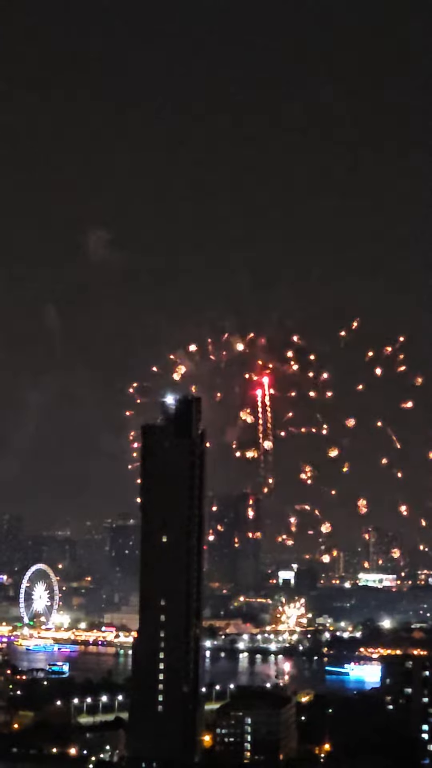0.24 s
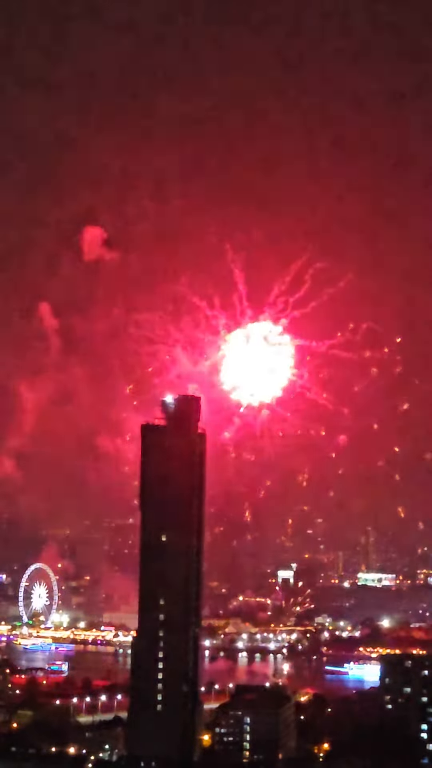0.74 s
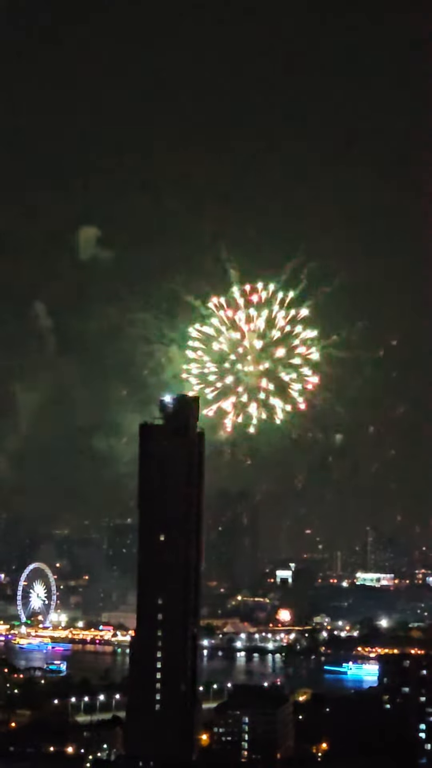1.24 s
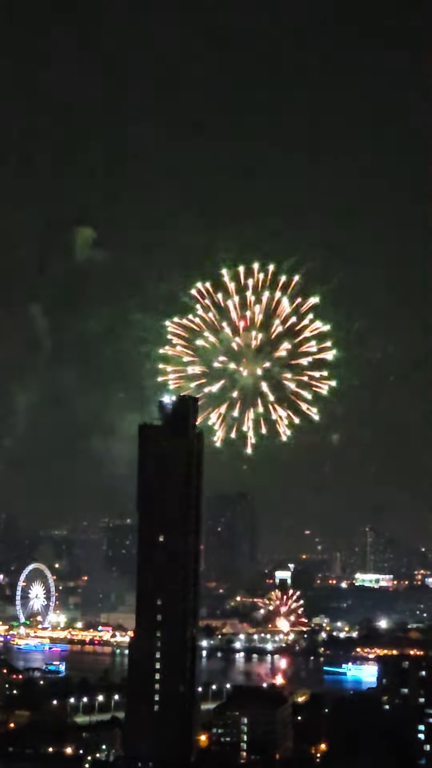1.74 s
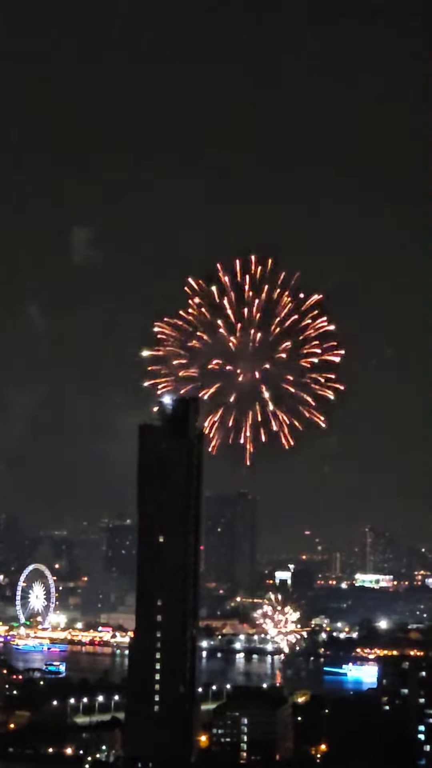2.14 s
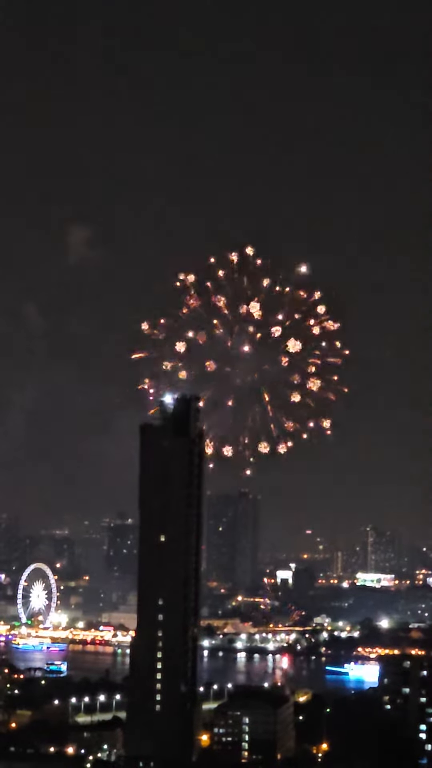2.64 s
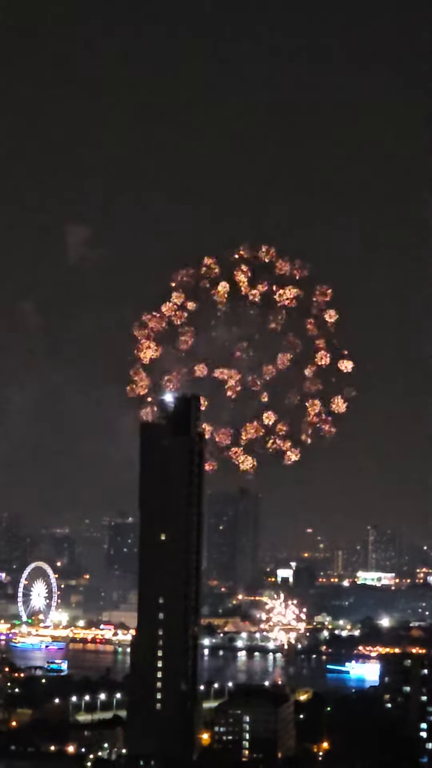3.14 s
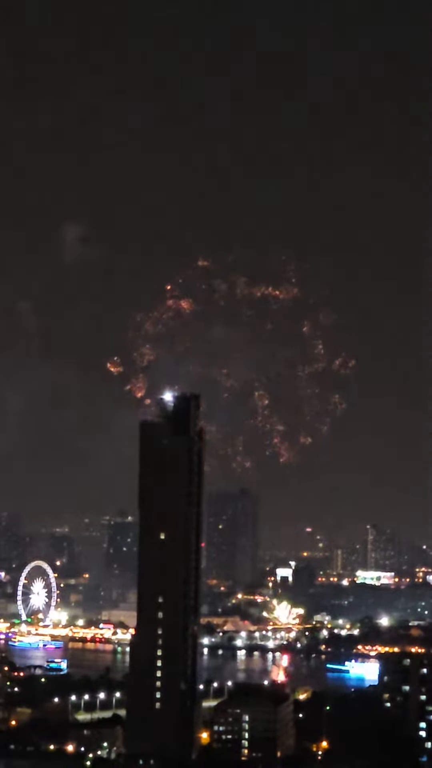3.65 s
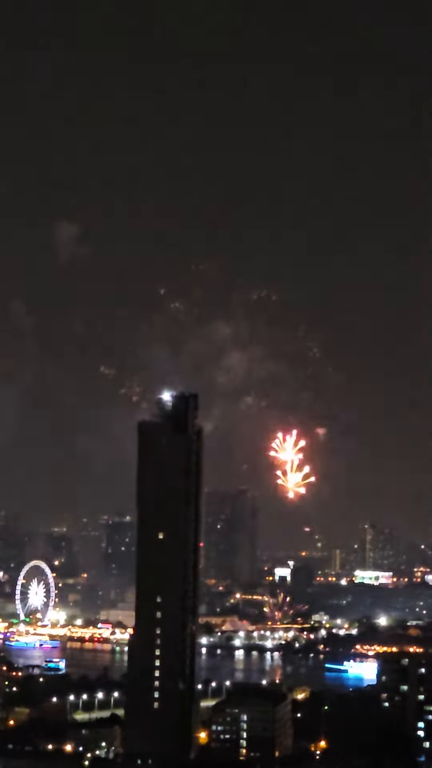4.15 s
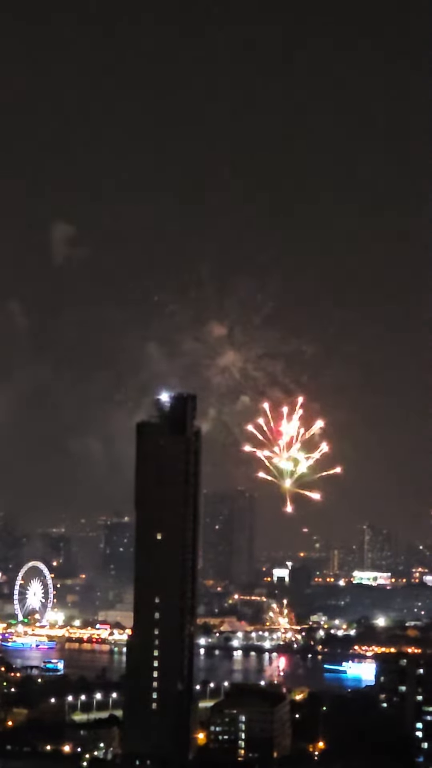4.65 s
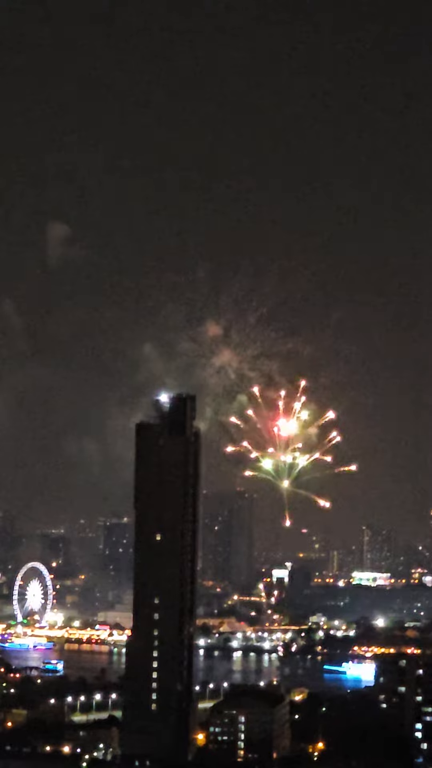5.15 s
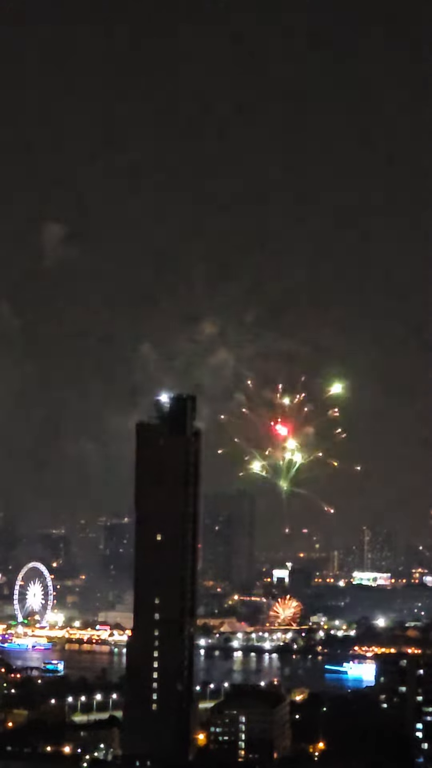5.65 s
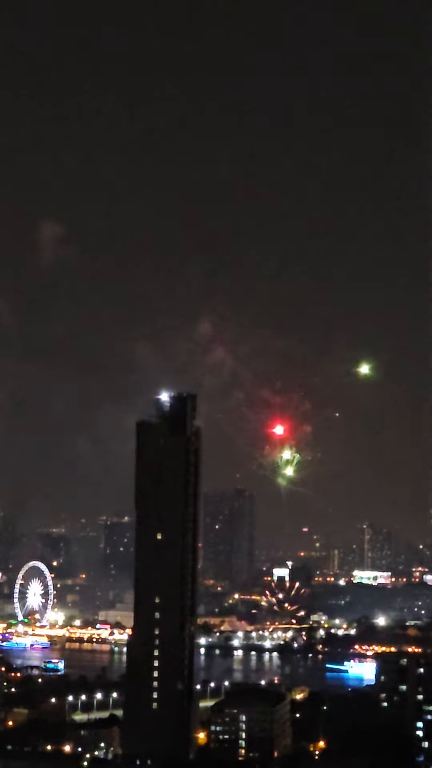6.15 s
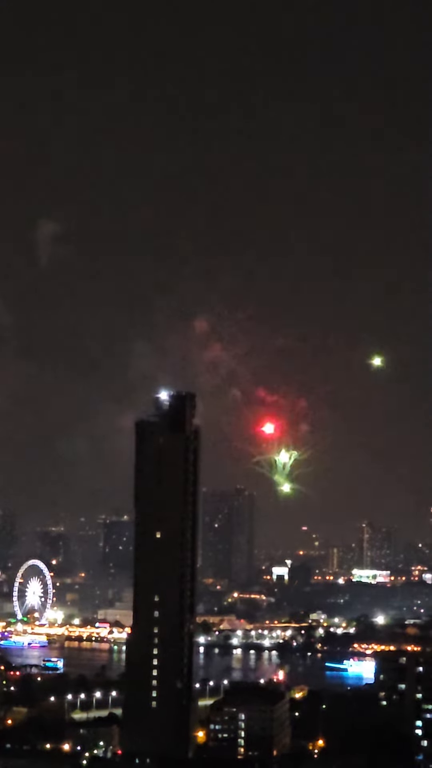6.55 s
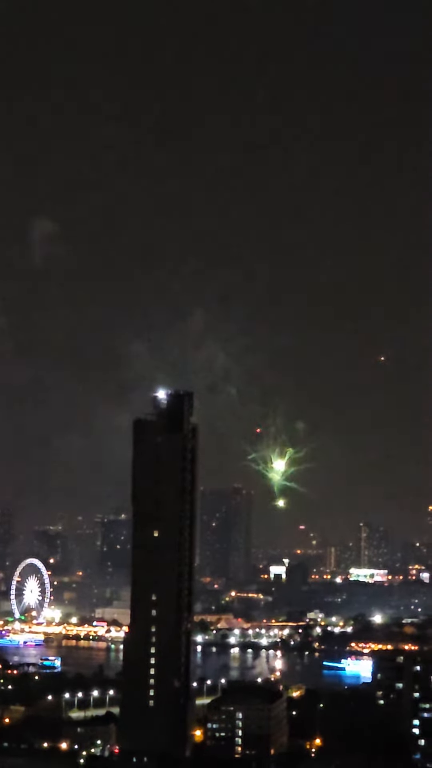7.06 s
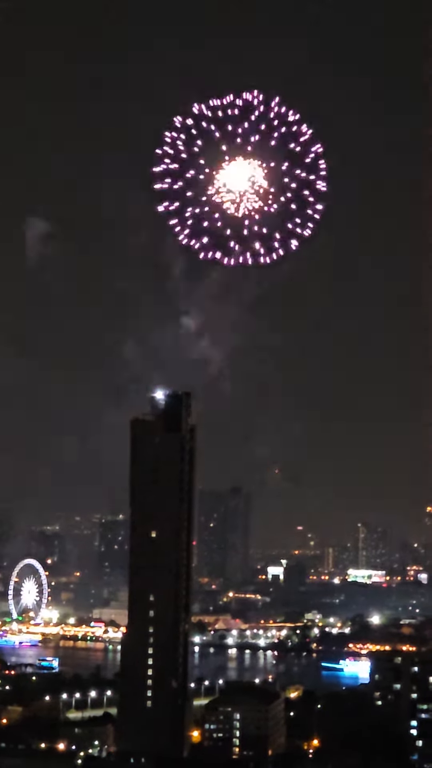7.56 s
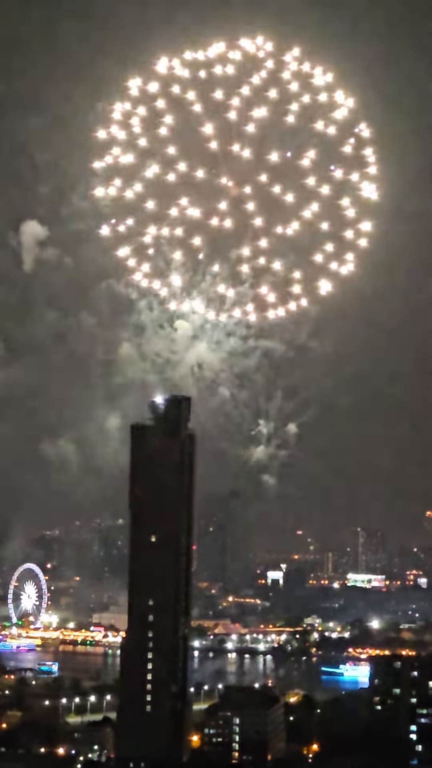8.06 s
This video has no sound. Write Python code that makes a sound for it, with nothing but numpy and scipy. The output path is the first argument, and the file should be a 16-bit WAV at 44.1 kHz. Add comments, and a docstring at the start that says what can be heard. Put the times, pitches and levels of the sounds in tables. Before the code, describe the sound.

A stereo phone on a high balcony hears distant fireworks over a night city. Soft, low traffic hiss runs throughout beneath rolling echoes. Dull booms cluster from 0.2 to 0.7 seconds, with faint close rustling and tiny high squeaks around 0.4 to 0.7. A strong thump lands at 1.2, more at 1.6 and 1.9 to 2.3, with small squeaks near 2.0 and 2.5. Heavy blasts follow at 2.65, 3.0 and 3.25, then their rumble decays into a lull until 4.7, with very faint squeaks near 4.5. A dense volley pounds from 4.7 to 6.4, strongest around 5.4, 5.9 and 6.4, while light rustle swells near 4.8. A weak thud and one dry close tick come around 6.9. After a quieter rumble, separate booms hit at 7.4, 7.85 and 8.07, echoes still rolling at the end. Deep bass is thinned and peaks are limited.

```python
"""A high balcony over a night city, with fireworks bursting far off.
Each shell sends a pressure wave dulled by the air; random echoes off the buildings merge into a rolling rumble.
Shaped noise makes the steady city hiss. Close by there are a flickering treble rustle, tiny wavering squeaks
and one tick of narrow noise. The phone cuts the deep bass of blasts and echoes and limits the peaks of the mix."""
import sys
import numpy as np
from scipy import signal
from scipy.fft import rfft, irfft, next_fast_len
from scipy.io import wavfile
from scipy.ndimage import uniform_filter1d, minimum_filter1d

SR = 44100
rng = np.random.default_rng(int(sys.argv[2]) if len(sys.argv) > 2 else 0)


def digitize_waveform(pressure):
    """Quantize a signal to 16-bit integers and store it at the path in sys.argv[1].

    Rows of a 2-D input are taken as channels; values are limited to [-1, 1].
    """
    field = np.atleast_2d(pressure).T
    bounded = np.clip(field, -1, 1)
    quanta = np.round(bounded * 32767).astype(np.int16)
    wavfile.write(sys.argv[1], SR, quanta)


def rack_gain(trim_db):
    """Turn a fader trim in dB into the linear factor to multiply a signal by."""
    fader = np.asarray(trim_db, float)
    return 10 ** (fader / 20)


N = 366030  # samples, 8.3 s


def low(x, hz, order):
    """Low-pass."""
    return signal.sosfilt(signal.butter(order, hz, fs=SR, output="sos"), x)


def band(x, lo_hz, hi_hz):
    """Band-pass."""
    return signal.sosfilt(signal.butter(2, [lo_hz, hi_hz], "band", fs=SR, output="sos"), x)


def level(x, db):
    """Scale to an rms level."""
    return x * rack_gain(db) / np.sqrt(np.mean(x ** 2))


def curve(s, values):
    """Straight lines between points in time."""
    return np.interp(np.arange(N) / SR, s, values)


def colour(x, hz, db, radians=None):
    """Gain and phase joined by straight lines over log frequency."""
    size = next_fast_len(N + SR)  # padded, so that the end does not wrap round to the start
    log_f = np.log(np.arange(size // 2 + 1) * SR / size + 1)
    gain = rack_gain(np.interp(log_f, np.log(hz), db))
    turn = 1 if radians is None else np.exp(1j * np.interp(log_f, np.log(hz), radians))
    return irfft(rfft(x, size) * turn * gain, size)[:N]


def walk(rate):
    """Random levels held 1 / rate s, with the steps smoothed twice."""
    k = int(SR / rate)
    held = np.repeat(rng.standard_normal(N // k + 1), k)
    return uniform_filter1d(uniform_filter1d(held, k), k)[:N]


def swell_shape(s, rise_s, fade_s):
    """Power, on every 32nd sample, that builds up to one at time s and dies away."""
    age = np.arange(0, N, 32) / SR - s
    return np.exp(2 * np.where(age < 0, age / rise_s, -age / fade_s))


def envelope(power):
    """Gain for every sample from a coarse run of power."""
    return curve(np.arange(0, N, 32) / SR, np.sqrt(power))


def bass_cut(x):
    """The phone's steep bass cut turns every push into a short falling boom."""
    # resonant high-passes in series: corner_hz, damping (no unit)
    low_cut = [(86.5, 0.65), (66, 2.8)]
    for hz, damping in low_cut:
        w = 2 * np.pi * hz
        x = signal.lfilter(*signal.bilinear([1, 0, 0], [1, w * damping, w * w], SR), x)
    return x


def blast(push_ms):
    """A jump of pressure, a fall through zero after push_ms and a suction."""
    u = np.arange(SR // 20) / SR / (push_ms / 1000)
    return (1 - u) * np.exp(-u)


def city():
    """Far traffic: smooth noise, swelling a little; the treble is wider than the bass."""
    # spectrum of the hiss: frequency_hz, common_db per Hz, wide_db per Hz (opposite at the two ports)
    city_hiss = [(22, -62.5, -80), (42.8, -51.5, -75.5), (209, -53, -71), (340, -72.5, -88.5),
                 (750, -66, -78), (1190, -70.5, -83), (1357, -68, -75.5), (1734, -78, -85),
                 (1930, -73.5, -81), (2570, -86, -90.5), (3070, -87, -93), (4500, -101, -104),
                 (5600, -107, -110), (7600, -116, -116), (9400, -128, -128), (15000, -132, -131)]
    # the traffic swells and ebbs: time_s, gain_db
    traffic_swell = [(0, -2), (1, 0), (3.9, 0.5), (4.5, 2), (5.1, 1), (5.9, -1.6), (6.8, 0), (7.2, 0),
                     (8.3, 1.5)]
    hz, common_db, wide_db = np.transpose(city_hiss)
    white = rng.standard_normal((2, N)) * np.sqrt(SR / 2)  # unit power per Hz
    common, wide = colour(white[0], hz, common_db), colour(white[1], hz, wide_db)
    swell = rack_gain(curve(*np.transpose(traffic_swell)))
    return swell * np.array([common + wide, common - wide])


def rustle():
    """Close treble noise in two bands, swelling and flickering, partly different at each port."""
    # swells of the rustle: height_s, lower_band_db, upper_band_db, build_up_s, fade_s
    rustle_swells = [(0.08, -55.5, -63, 0.13, 0.24), (0.28, -53.5, -70, 0.2, 0.27),
                     (1.98, -60.5, -77.5, 0.2, 0.6), (2.6, -61.5, -91, 0.3, 0.33),
                     (3.95, -62, -75, 0.9, 0.79), (4.75, -53.5, -74, 0.27, 0.2),
                     (4.93, -53, -74.5, 0.2, 0.08), (5.92, -58, -81.5, 0.36, 0.98),
                     (6.901, -57, -78.5, 1, 0.5), (7.92, -64, -90, 0.12, 0.11),
                     (8.28, -66, -87.5, 0.28, 0.5)]
    # the two bands: low_edge_hz, high_edge_hz
    rustle_bands = [(2200, 5140), (6800, 9000)]
    # level between the swells: lower_band_db, upper_band_db
    rest_db = (-72, -92)
    out = 0
    for k, (lo_hz, hi_hz) in enumerate(rustle_bands):
        power = rack_gain(rest_db[k]) ** 2
        for s, *band_db, rise_s, fade_s in rustle_swells:
            power = power + rack_gain(band_db[k]) ** 2 * swell_shape(s, rise_s, fade_s)
        noise = rng.standard_normal((2, N)) + 0.61 * rng.standard_normal(N)
        noise = band(band(noise, lo_hz, hi_hz), lo_hz, hi_hz)
        flicker = rack_gain(1.2 * walk(90))
        out = out + level(noise, 0) * envelope(power) * flicker
    return out


def squeaks():
    """Short tones of wavering pitch with their octave, swelling and fading smoothly."""
    # tiny squeaks: start_s, fundamental_peak_db, pitch_hz, length_ms, octave_db (against the fundamental)
    squeak_list = [(.405, -51, 4150, 22, -23), (.52, -55, 4150, 50, -19), (.626, -48.5, 3770, 34, -18),
                   (.668, -53, 3900, 50, -23), (1.964, -45.5, 2840, 42, -6), (2.02, -51, 2900, 49, -16),
                   (2.472, -46.5, 3450, 20, -17), (4.445, -62, 5200, 18, -35), (4.565, -59, 5150, 25, -21)]
    out, waver = np.zeros(N), 1 + .013 * walk(160)
    for s, db, hz, ms, octave_db in squeak_list:
        n, i = int(ms * SR / 1000), int(s * SR)
        phase = 2 * np.pi * hz * np.cumsum(waver[i:i + n]) / SR
        tone = np.sin(phase) + rack_gain(octave_db) * np.sin(2 * phase)
        out[i:i + n] += rack_gain(db) * np.hanning(n) * tone
    return out


def tick():
    """A dry tick close by: narrow noise that rises and dies within milliseconds."""
    # start_s, noise_db (rms before the snap shapes it), low_edge_hz, high_edge_hz
    tick_settings = (6.893, -39, 3400, 4700)
    s, db, lo_hz, hi_hz = tick_settings
    age = np.maximum(np.arange(N) / SR - s, 0)
    snap = age / 0.0022 * np.exp(-age / 0.0021)
    return level(band(rng.standard_normal(N), lo_hz, hi_hz), db) * snap


def echoes(per_s, spread_db, push_ms):
    """Blasts that return at random moments with random strength and sign."""
    draw = rng.random((3, N))
    arrives = draw[0] < per_s / SR
    strength = rack_gain(-spread_db * np.log(draw[1] + 1e-9)) * np.sign(draw[2] - .5)
    return bass_cut(signal.fftconvolve(arrives * strength, blast(push_ms))[:N])


def roll():
    """The long way round leaves a boom; the shorter returns still rattle. A small share comes from the sides."""
    # flocks of echoes rolling in from the buildings:
    # height_s, boom_db, depth_db (deep part against the drummy part), rattle_db, fade_ms
    flocks = [(0.14, -23, 6.5, -45, 130), (0.22, -26, -10, -33.5, 50), (0.301, -12.5, -9, -18.5, 21),
              (0.364, -9.5, 3, -31, 60), (0.57, -14.5, -3, -36.5, 60), (0.631, -9, 7, -43, 40),
              (0.7, -12.5, 2, -28.5, 56), (1.001, -21.5, -5.5, -43.5, 170), (1.243, -18.5, -1, -30.5, 82),
              (1.401, -25, -1.5, -36.5, 150), (1.58, -13, -3.5, -23, 30), (1.619, -15, -0.5, -31, 44),
              (1.72, -19.5, -3.5, -28.5, 160), (1.918, -18.5, -3.5, -29, 44),
              (2.061, -17, -6.5, -30.5, 180), (2.36, -15, 5.5, -32, 63), (2.539, -23, -6.5, -40.5, 80),
              (2.679, -14.5, 2, -23.5, 51), (2.841, -19, 4, -33.5, 330), (3.014, -13.5, 0.5, -15, 17),
              (3.08, -16, -1, -30, 150), (3.249, -14, -3, -33.5, 74), (3.342, -17.5, -4, -26.5, 130),
              (3.55, -23, -10.5, -38, 170), (3.78, -18.5, 0, -34.5, 120), (4.08, -27.5, -2.5, -39, 50),
              (4.302, -22.5, -11.5, -53, 50), (4.44, -23.5, 11.5, -41.5, 47), (4.671, -13.5, -2, -21, 30),
              (4.74, -20, 3.5, -31, 37), (4.82, -26.5, 3, -38, 110), (4.99, -17, 0, -20.5, 30),
              (5.029, -13.5, -2, -22.5, 70), (5.1, -16.5, -8, -32, 44), (5.189, -15, -10.5, -24.5, 64),
              (5.29, -22, -4.5, -34, 110), (5.42, -12, 2, -27, 27), (5.439, -10.5, -4.5, -31.5, 22),
              (5.465, -13, 3, -28.5, 30), (5.601, -17, -0.5, -27, 100), (5.76, -17, -13.5, -32, 60),
              (5.83, -20.5, 5.5, -34.5, 69), (5.932, -15, -1, -28.5, 32), (6.039, -19, -5.5, -34, 120),
              (6.14, -10.5, -12.5, -25.5, 36), (6.235, -15.5, -8.5, -44, 36), (6.31, -18, -6.5, -40, 30),
              (6.418, -14, 1.5, -24, 100), (6.68, -22, -2, -32.5, 130), (6.79, -21.5, 7.5, -34.5, 80),
              (6.94, -20.5, -4, -30.5, 210), (7.24, -26, -6, -38, 77), (7.4, -25.5, 3.5, -40.5, 56),
              (7.46, -17.5, 2, -30, 47), (7.741, -18.5, 0, -32, 65), (7.92, -20, -2, -31, 120),
              (8.111, -16.5, -7.5, -29, 53), (8.279, -29, -1, -40.5, 100)]
    # the faintest echoes never stop: deep_db, drummy_db, rattle_db
    murmur_db = (-33.5, -29.5, -40)
    rise_share, rattle_share = 0.75, 0.59  # build-up against its own fade; rattle's fade against the boom's
    power = rack_gain(np.array(murmur_db))[:, None] ** 2
    for s, boom_db, depth_db, rattle_db, fade_ms in flocks:
        fade_s = max(fade_ms, 5) / 1000
        rattle_fade_s = rattle_share * fade_s
        deep_share = 1 / (1 + rack_gain(-depth_db) ** 2)
        boom = rack_gain(boom_db) ** 2 * swell_shape(s, rise_share * fade_s, fade_s)
        rattle = rack_gain(rattle_db) ** 2 * swell_shape(s, rise_share * rattle_fade_s, rattle_fade_s)
        power = power + np.array([deep_share * boom, (1 - deep_share) * boom, rattle])
    deep_gain, drummy_gain, rattle_gain = map(envelope, power)
    out = 0
    middle, sides = 1, np.array([[1], [-1]])  # sides: opposite sign at the two ports
    for sign, boom_share_db, rattle_share_db in ((middle, 0, 0), (sides, -23, -15)):
        deep = level(low(echoes(250, 2.0, 6), 125, order=4), boom_share_db)
        drummy = level(low(band(echoes(350, 1.52, 0.8), 125, 307), 252.6, order=6), boom_share_db)
        rattle = level(band(echoes(1200, 2.06, 0.86), 300, 627), rattle_share_db)
        out = out + sign * (deep * deep_gain + drummy * drummy_gain + rattle * rattle_gain)
    return out


def bursts():
    """Each blast arrives dull, with what is left of its sharp front; turbulent air frays the front into a spray."""
    # shell bursts and their strongest returns, levels before the filters and shaping below:
    # start_s, overpressure_db, push_ms, front_db (sharp front against the push), spray_db
    burst_list = [(0.2013, 6.5, 0.87, -26, -50), (0.3084, 6, 4.5, -19, -40), (0.339, -5, 4.4, -22, -47.0),
                  (0.372, -3, 0.86, -24, -44), (0.5656, 3, 1.1, -26, -48.5), (0.6306, -2, 8.7, -15.5, -45),
                  (0.6817, 2, 1.4, -6.5, -35.5), (0.702, -2.5, 2.5, -22, -47.0),
                  (1.143, -4.5, 0.8, -4, -42), (1.228, 16.5, 0.84, -22, -27.5), (1.5647, 7, 2.8, -10, -27),
                  (1.5922, -6, 8.0, -14, -32), (1.6135, 1.5, 3.4, -7, -41), (1.9213, 1, 0.97, -15.5, -40),
                  (2.0607, 3, 1.2, -16.5, -47.5), (2.291, 7, 0.8, -21.5, -47.5),
                  (2.322, 13, 8.0, -20.5, -28.5), (2.651, 8, 2.5, -12, -23), (2.698, 1, 3.0, -9, -45.5),
                  (2.8802, -5, 9.5, -13, -42), (3.0044, 8, 5.8, -2.5, -21.5), (3.058, 3.2, 13, -15, -42.5),
                  (3.1102, -5, 6.2, -16.5, -57), (3.2532, 17.5, 1.1, -18.5, -22.5),
                  (3.333, -1, 1.5, -11.5, -31), (3.3396, 3, 4.0, -8.5, -40.5), (4.6797, 6.5, 2.2, -2, -24),
                  (4.969, 11.5, 1.4, -5, -30), (5.015, 4.5, 3.6, -19.5, -43), (5.028, 4, 4.0, -13.5, -44),
                  (5.094, 2.5, 1.1, -19, -45), (5.177, 6, 1.4, -13, -39), (5.194, 3.5, 0.48, -2.5, -36),
                  (5.2056, -4, 1.0, -14, -41.5), (5.4111, 16.5, 0.95, -7.5, -23.5),
                  (5.4368, -1.5, 0.83, -11, -38), (5.4638, -7.5, 9.3, 1.5, -46.5),
                  (5.7559, 9.5, 0.6, -19.5, -46), (5.8091, -0.5, 1.5, -19, -47),
                  (5.93, 12.5, 1.6, -7.5, -29), (6.119, -0.5, 0.8, -10, -44), (6.1339, 5, 0.54, -19.5, -47),
                  (6.2327, -4, 1.8, -30, -47), (6.302, -2.5, 0.74, -18, -53), (6.401, 6.5, 1.8, -20, -31.5),
                  (6.426, 14, 1.1, -30, -28), (6.838, 1, 0.5, -5.5, -42), (7.4316, 13.5, 2.2, -16.5, -26),
                  (7.844, 7.5, 0.9, -23.5, -37.5), (8.0662, 8.5, 2.5, -8.5, -27)]
    push, front, spray = np.zeros(N + SR), np.zeros(N + SR), np.zeros((2, N + SR))
    t = np.arange(SR // 20) / SR
    noise = rng.standard_normal((len(burst_list), 3, len(t)))
    noise = noise[:, :1] + 0.84 * noise[:, 1:]  # one shared part, one part for each port
    noise = low(band(noise, 800, 2110), 3600, order=3)
    fray = level(noise, 0) * t / 0.0037 * np.exp(1 - t / 0.0028)
    for (s, db, push_ms, front_db, spray_db), hiss in zip(burst_list, fray):
        wave, i = rack_gain(db) * blast(max(push_ms, .3)), round(s * SR)
        push[i:i + len(t)] += wave
        front[i:i + len(t)] += rack_gain(front_db) * wave
        spray[:, i:i + len(t)] += rack_gain(spray_db) * hiss
    dull = low(push[:N], 235, order=2)
    rounded_front = low(front[:N], 650, order=2)  # over such a distance the air rounds off even the front
    return bass_cut(low(dull + rounded_front, 1400, order=2)) + spray[:, :N]


def scene():
    """All sources at the two microphone ports."""
    return city() + rustle() + squeaks() + tick() + roll() + bursts()


def limiter(x):
    """A quick limiter, shared by both ports, ducks just ahead of peaks over 0.97 of full scale."""
    gain = np.minimum(1, .97 / (np.abs(x).max(axis=0) + 1e-9))
    return x * uniform_filter1d(minimum_filter1d(gain, size=161), size=161)


def roll_off(x):
    """The treble ends steeply here."""
    return signal.sosfilt(signal.butter(12, 15700, fs=SR, output="sos"), x)


def record(dry):
    """Two microphone ports of unequal colour and phase, then the limiter."""
    # how the ports differ: frequency_hz, left_minus_right_db, left_lead_radians
    port_lean = [(40, 1.4, -.28), (125, .9, -.15), (250, .8, -.18), (520, 1, -.25), (800, -.5, -.15),
                 (1220, -2.8, 0), (1880, -3.5, .3), (2900, .5, .7), (5000, .8, 0)]
    hz, db, lead = np.transpose(port_lean)
    left = colour(dry[0], hz, db / 2, lead / 2)
    right = colour(dry[1], hz, -db / 2, -lead / 2)
    mix = limiter(np.array([left, right]))
    return roll_off(mix)


dry = scene()
out = record(dry)
digitize_waveform(out)
```